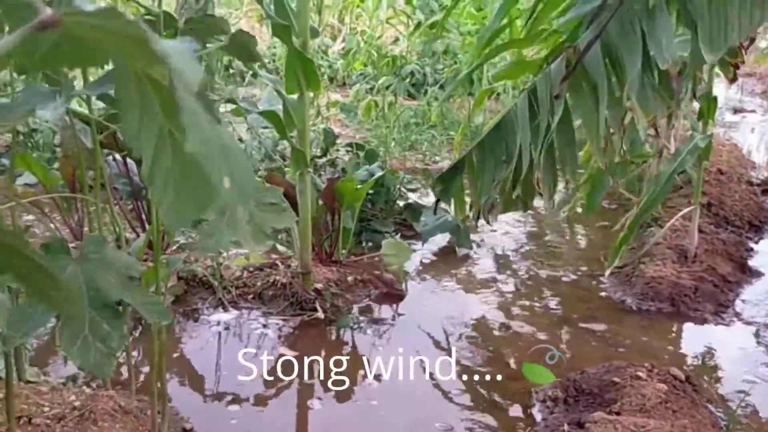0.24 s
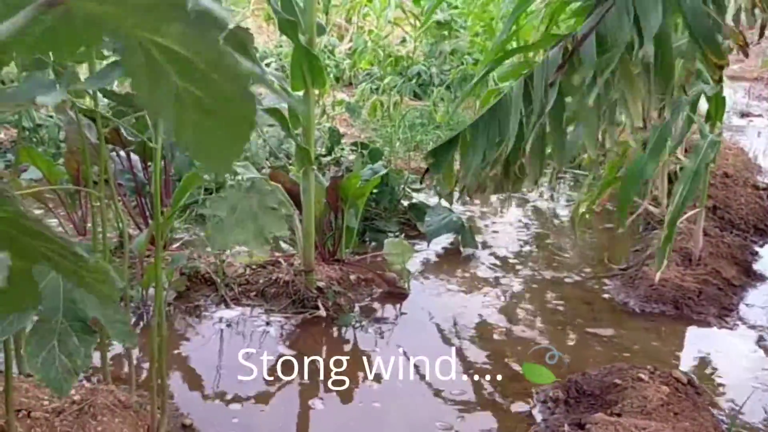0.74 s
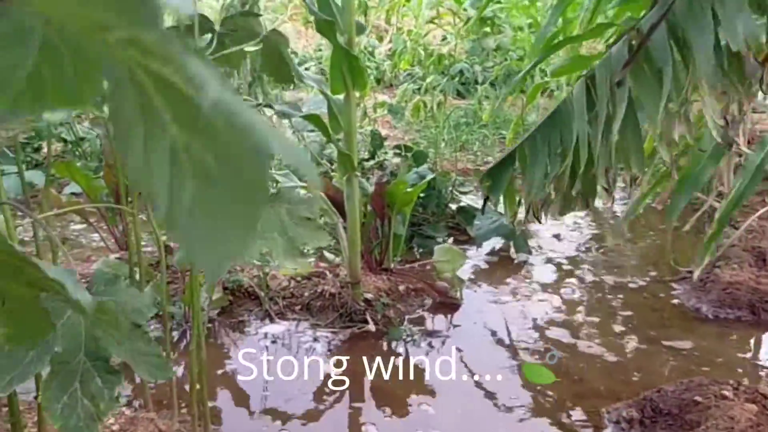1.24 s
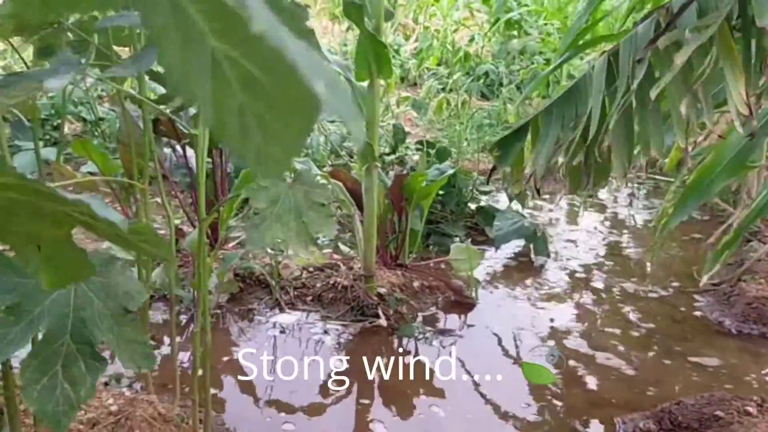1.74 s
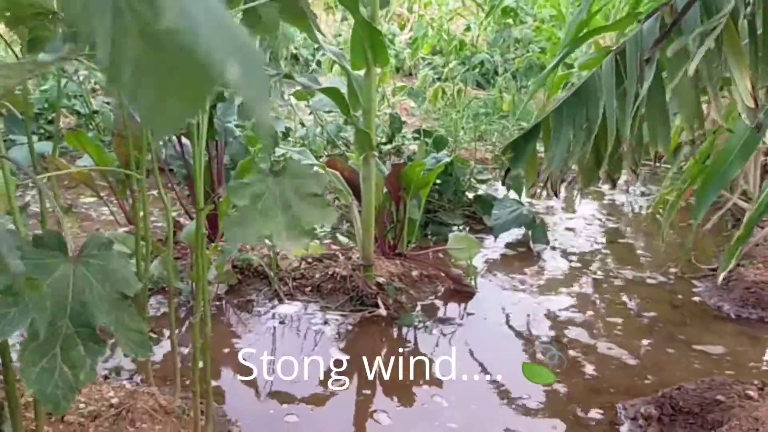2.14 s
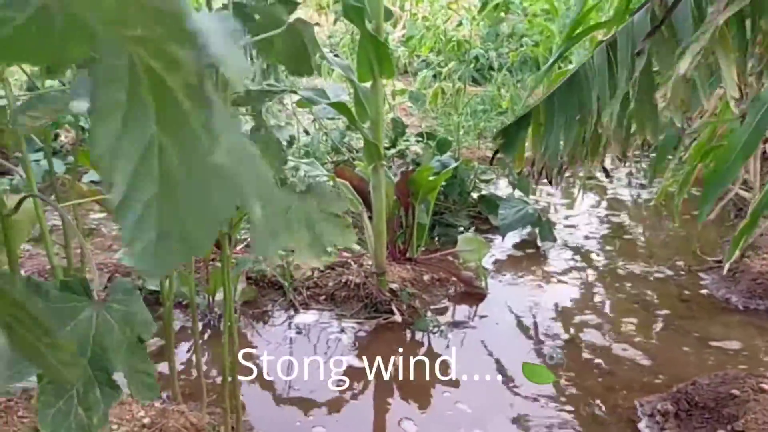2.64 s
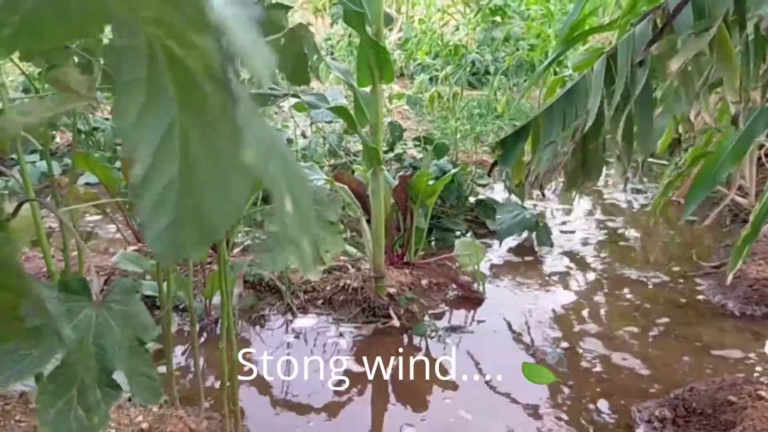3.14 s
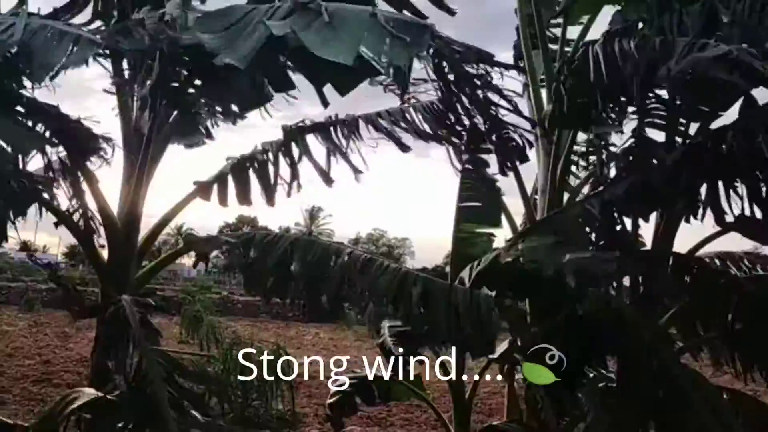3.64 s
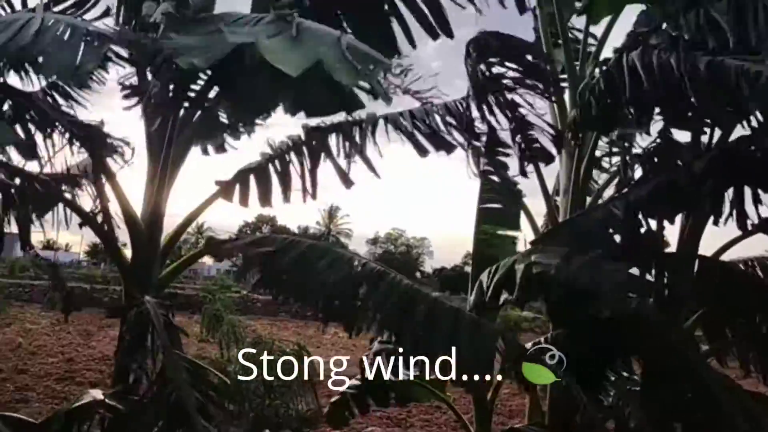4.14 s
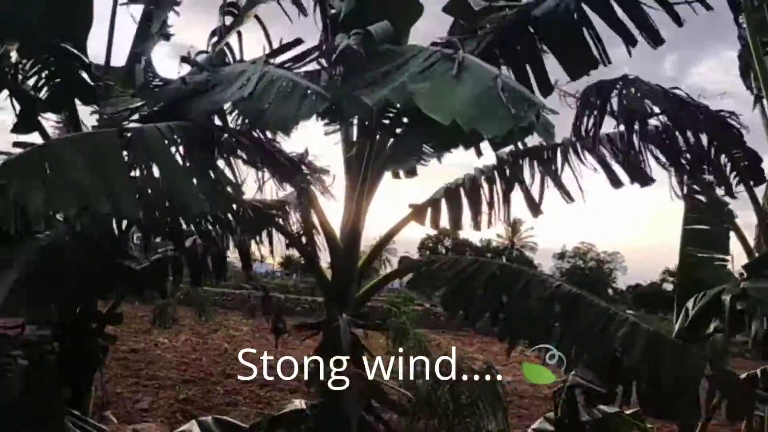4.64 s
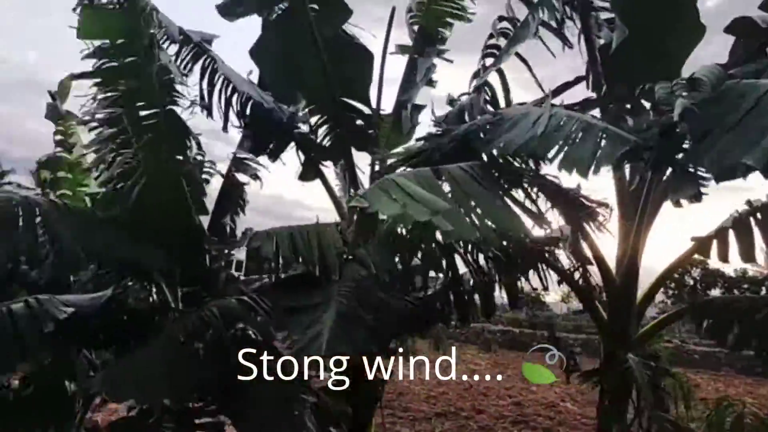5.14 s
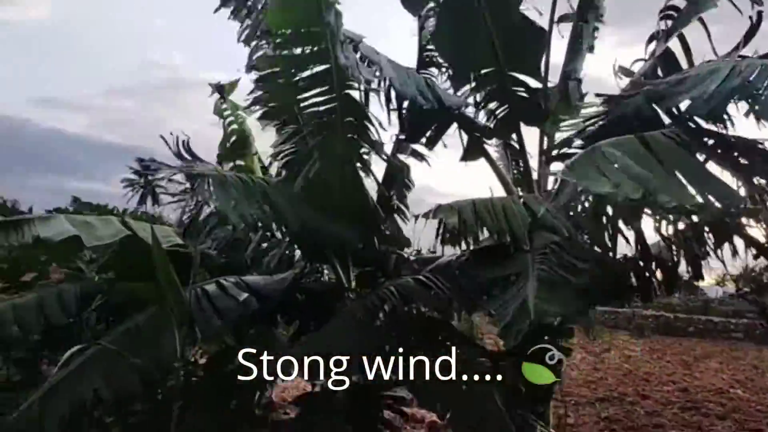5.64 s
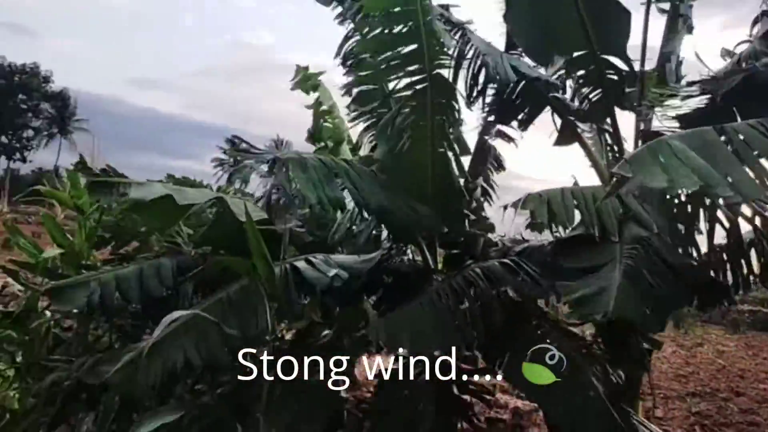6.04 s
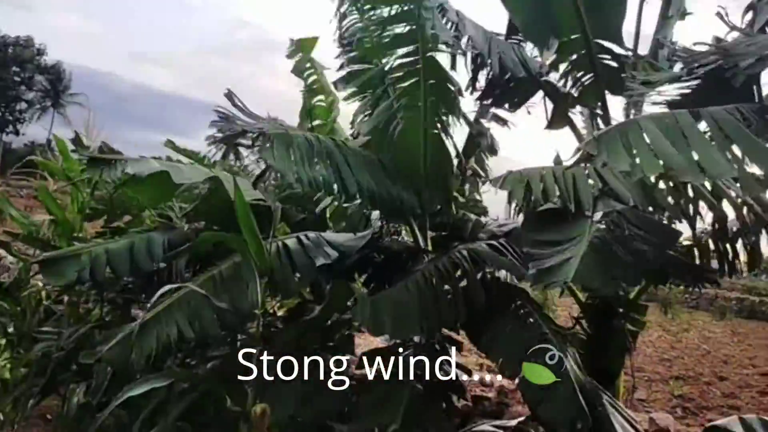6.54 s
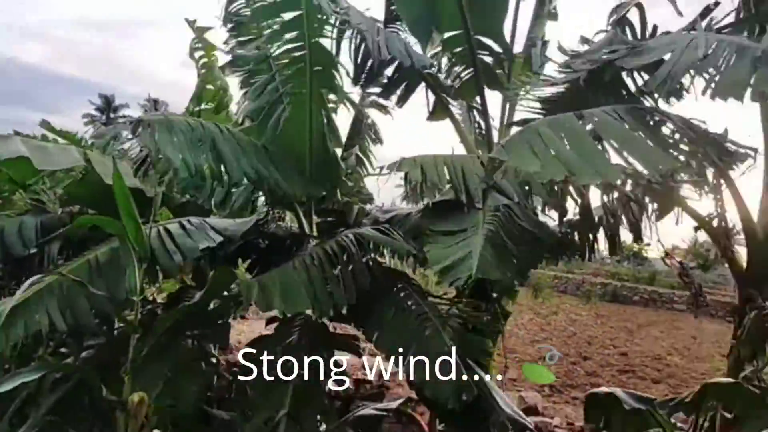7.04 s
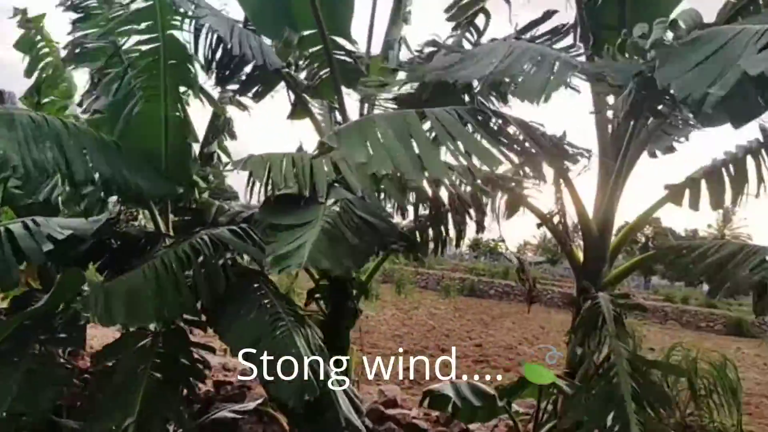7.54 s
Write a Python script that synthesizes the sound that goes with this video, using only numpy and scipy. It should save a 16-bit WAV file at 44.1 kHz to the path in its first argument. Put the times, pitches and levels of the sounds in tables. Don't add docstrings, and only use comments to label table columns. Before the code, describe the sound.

Strong wind in an open garden, caught close on a phone. From 0 to 3.7 s gusts buffet the microphone with low, fluttering thumps, heavy around 0.2 s, 1.7 s and 3.1 s, while small shrub leaves make a continuous dense hiss with papery slaps and touches. A crisp, loud leaf snap cracks at about 1.97 s, a small sharp pop at 2.7 s, and the hardest gust pops loudly at 3.47 s. At 3.7 s the sound cuts abruptly to large torn fronds: quieter rustle, rapid dry high ticks, a bright, ringing fizz and hollow low flaps, with only light wind rumble. A faint, short, hoarse bird note comes around 4.5-4.6 s. From 5.3 s the high fizz softens as the phone turns; slaps at 5.7 s and a swelling leaf press at 6.1 s stand out, then scattered crackling, thicker from 7.1 s, continues to the end at 7.8 s.

```python
import sys
import numpy as np
from scipy import signal
from scipy.fft import rfft, irfft
from scipy.io import wavfile
from scipy.ndimage import uniform_filter1d

SR = 44100
rng = np.random.default_rng(int(sys.argv[2]) if len(sys.argv) > 2 else 0)


def store_pcm(level_fs):
    pcm = np.round(np.clip(level_fs, -1, 1) * 32767).astype(np.int16)
    wavfile.write(sys.argv[1], SR, np.atleast_2d(pcm).T)


def decibels_to_gain(level_db):
    exponent = np.asarray(level_db, float) / 20
    return 10 ** exponent


N = 343539

# (time [s], frequency [Hz], relative level [dB])
CAVITY_RING = [(3.7, 10360, -16), (3.9, 10200, -12), (4.4, 10370, -12), (4.62, 10800, -12),
               (4.85, 10650, -16), (4.95, 10540, -15), (5.06, 10760, -12), (5.22, 10060, -9),
               (5.4, 9340, -13), (5.6, 9350, -16), (5.8, 10240, -21), (7.0, 9650, -23), (7.79, 9600, -20)]


def evened(x):
    return x / np.sqrt(np.mean(x ** 2) + 1e-20)


def read(points, hz):
    f, value = np.transpose(points)
    return np.interp(np.log(hz + 1), np.log(f + 1), value)


def columns(rows):
    s, *values = np.transpose(rows)
    return [np.interp(np.arange(N) / SR, s, v) for v in values]


def causal(points, size=4096):
    level_db = read(points, abs(np.fft.fftfreq(size, 1 / SR)))
    log_gain = np.log(decibels_to_gain(np.maximum(level_db, -100)))
    phase = -signal.hilbert(log_gain).imag
    taps = np.fft.ifft(np.exp(log_gain + 1j * phase)).real[:size // 2]
    return taps / np.linalg.norm(taps)


def drift(per_s):
    hz = np.fft.rfftfreq(N, 1 / SR)
    spectrum = rfft(rng.standard_normal(N)) / (1 + (hz / per_s) ** 2)
    return evened(irfft(spectrum, N))


def resonate(x, hz, width):
    carrier = np.exp(2j * np.pi * np.cumsum(hz) / SR)
    r = np.exp(-np.pi * width / SR)
    return 2 * (carrier * signal.lfilter([1 - r], [1, -r], x / carrier)).real


def gusts():
    # (time [s], level [dB])
    breeze = [(0.0, -50), (1.0, -50.5), (1.55, -46), (2.1, -53.5), (3.3, -41), (3.6, -40.5), (4.25, -53),
              (5.0, -59), (6.2, -54.5), (7.2, -57.5), (7.79, -56)]
    # (centre [s], length [s], strength [dB], hardness [dB])
    shrub_gusts = [(0.06,0.14,-39,-17),(0.198,0.039,-30.5,-16),(0.238,0.035,-28,-15),(0.335,0.12,-34,-4),(0.479,0.18,-37.5,-6),(0.556,0.085,-43,-15),(0.637,0.18,-39,-23),(0.752,0.14,-39.5,-3.5),
                   (1.07,0.13,-40.5,-1),(1.234,0.077,-44,-15),(1.326,0.046,-36.5,-7),(1.44,0.094,-37,-5),(1.605,0.14,-33.5,-9),(1.669,0.044,-26.5,-8),(1.764,0.094,-39.5,-18),
                   (2.04,0.12,-48,-16),(2.14,0.125,-49,-4),(2.39,0.061,-39,-17),(2.489,0.2,-41,-5.5),(2.66,.06,-39,-17),(2.743,0.17,-35.5,-4.5),(2.867,0.07,-43,-6),
                   (2.966,0.091,-38,-12),(3.083,0.067,-28,-10),(3.26,0.057,-33.5,-10),(3.433,0.033,-29.5,-5),(3.464,0.048,-24,12),(3.654,0.042,-32,1)]
    frond_gusts = [(3.791, 0.099, -35.5, -6), (3.931, 0.031, -45, 7), (3.996, 0.064, -54, -16),
                   (4.066, 0.07, -47, -21), (4.35, 0.022, -38, -11), (4.47, 0.061, -47, 0),
                   (4.52, 0.033, -41.5, -5), (4.58, 0.021, -38, -15), (4.684, 0.081, -45, -0.5),
                   (4.784, 0.025, -37.5, -21), (4.899, 0.19, -44, -3), (5.128, 0.18, -44.5, -7),
                   (5.253, 0.11, -46.5, -6), (5.313, 0.055, -62, -2), (5.368, 0.055, -47, -18),
                   (5.453, 0.046, -49, 0), (5.622, 0.26, -47, -3.5), (5.887, 0.068, -56, 13),
                   (5.976, 0.27, -56, 11), (6.455, 0.11, -51, -2), (6.849, 0.1, -44, 0),
                   (6.934, 0.043, -42, 2), (7.029, 0.081, -50, -7), (7.318, 0.066, -51, -1),
                   (7.428, 0.043, -48, -9), (7.787, 0.085, -42, -1)]
    breeze_hard_db = -4.5
    t = np.arange(N) / SR
    soft = decibels_to_gain(2 * columns(breeze)[0])
    hard = soft * decibels_to_gain(2 * breeze_hard_db)
    for s, length, db, hard_db in shrub_gusts + frond_gusts:
        near = slice(max(round((s - .4) * SR), 0), round((s + .4) * SR))
        power = decibels_to_gain(2 * db) * 4. ** -((2 * (t[near] - s) / length) ** 2)
        share = decibels_to_gain(2 * hard_db)
        soft[near] += power / (1 + share)
        hard[near] += power * share / (1 + share)
    return 10 * np.log10(soft), 10 * np.log10(hard / soft)


def eddies(points, span_s):
    x = signal.oaconvolve(rng.standard_normal(N + SR), causal(points, size=16384))[SR:][:N]
    local_power = uniform_filter1d(x ** 2, round(span_s * SR))
    return evened(x / np.sqrt(local_power + 0.27 * np.mean(x ** 2)))


def buffet():
    # (frequency [Hz], density [dB per Hz])
    eddy_spectra = [
        [(6, -39), (12, 12), (30, -2), (56, -3.5), (75, -23), (200, -88)],
        [(30, -47.5), (55, 2.5), (90, 1.5), (130, -8.5), (170, -35), (400, -111)],
        [(90, -38), (130, -1.5), (190, -4.5), (300, -16), (420, -20.5), (700, -63), (1500, -100)],
    ]
    thump_db, edge_db, edge_per_hard, edge_per_strength = -3.5, -9, 1.25, 0.022
    sway_db = 3
    level_db, hard_db = gusts()
    heave, thump, edge = (eddies(p, s) for p, s in zip(eddy_spectra, (.1, .045, .03)))
    edge = evened(edge * decibels_to_gain(2.0 * drift(39.0)))
    thump_level = thump_db + hard_db + sway_db * drift(18.0)
    edge_level = edge_db + edge_per_hard * hard_db + edge_per_strength * (level_db + 38)
    edge_level += sway_db * drift(21.0)
    return decibels_to_gain(level_db - 1.05) * (heave + decibels_to_gain(thump_level) * thump + decibels_to_gain(edge_level) * edge)


def patchy(patch_db, flicker_db):
    frames = N // 64 + 5
    a, b, patches = rng.standard_normal((frames, 129, 3)).T
    patches = evened(uniform_filter1d(uniform_filter1d(patches, 5, 0), 24, 1))
    flicker = evened(uniform_filter1d(rng.standard_normal(frames), 8))
    z = (a + 1j * b) * decibels_to_gain(patch_db * patches + flicker_db * flicker)
    return evened(signal.istft(z, nperseg=256, noverlap=192)[1][:N])


def grains(per_s, spread_db, lo_hz, hi_hz, cycles, clump_db, count=24):
    chance = per_s / SR * decibels_to_gain(clump_db * drift(14.))
    size = decibels_to_gain(spread_db * np.minimum(rng.exponential(1, N), 3.6)) * (rng.random(N) < chance)
    leaf, out = rng.integers(0, count, N), np.zeros(N)
    for k, hz in enumerate(np.geomspace(lo_hz, hi_hz, count)):
        turns = np.arange(768) * hz / SR
        ring = turns * np.exp(-turns / cycles) * np.sin(2 * np.pi * turns)
        ring_scaled = ring * np.sqrt(hz) / np.linalg.norm(ring)
        out += signal.oaconvolve(size * (leaf == k), ring_scaled)[:N]
    return evened(out)


def foliage():
    # (frequency [Hz], density [dB per Hz])
    holds = [
        [(150, -17.5), (250, -9.5), (456, -11.5), (860, -9.5), (1600, -5), (2300, -0.5), (2760, -4.5),
         (3390, -16), (4240, -15.5), (5210, -7), (6740, -7), (8140, -20.5), (9500, -17), (13000, -19.5),
         (15200, -19)],
        [(150, -22.5), (250, -9.5), (490, -9), (865, -3), (1300, -2.5), (1900, 2), (3550, 2), (4200, -9),
         (5050, -12), (6200, -13.5), (7900, -21), (9500, -17.5), (12600, -22.5), (14300, -21), (15200, -17.5)],
        [(150, -27), (250, -14), (1060, -12.5), (1580, -12.5), (2160, -1), (2520, -1.5), (3150, -5.5),
         (3650, -18.5), (4450, -35), (6180, -21), (8000, -31), (9500, -17.5), (12700, -25.5), (14600, -27),
         (15200, -24)],
    ]
    # (time [s], rustle level [dB], dry fizz above the port dip [relative dB])
    rustle = [
        [(0.0, -34.5, -0.5), (1.55, -35.5, -0.5), (1.98, -37, 0.5), (3.53, -36, -0.5), (3.68, -35, -0.5)],
        [(3.71, -39, -1.5), (3.8, -39, 4), (3.9, -42, 4.5), (5.44, -44.5, 2), (6.65, -43, 0.5),
         (6.87, -44.5, 2.5), (7.44, -42.5, 0), (7.79, -44.5, 1)],
    ]
    # (time [s], share of the turn away from the fronds [0-1])
    aim = [(3.7, 0.3), (3.95, 0.2), (5.05, 0.08), (5.3, 0.29), (5.6, 0.38), (5.9, 0.52), (6.4, 0.65),
           (7.79, 0.59)]
    change_s = 3.693
    level_db, fizz_db = columns(rustle[0] + rustle[1])
    fronds = np.clip((np.arange(N) / SR - change_s) / 0.003, 0, 1)
    turn = np.clip(columns(aim)[0], 0, 1)

    shrubs = patchy(1.0, 0.99) + decibels_to_gain(-10.5) * grains(2500, 5.5, 692, 15100, 1.0, 2.2, count=12)
    shrubs = evened(shrubs)
    torn = patchy(1.1, 1.57)
    torn += decibels_to_gain(-5.0 - 4.2 * turn) * grains(1500, 6.1, 4340, 15800, 1.8, 3.3, count=10)
    torn += decibels_to_gain(-12.5) * grains(700, 4.2, 1156, 3560, 2.9, 3.5, count=12)
    torn = evened(torn)

    drives = [(1 - fronds) * shrubs, fronds * (1 - turn) * torn, fronds * turn * torn]
    heard = sum(signal.oaconvolve(d, causal(hold))[:N] for d, hold in zip(drives, holds))
    fizz = signal.oaconvolve(heard, signal.firwin(101, 4200, pass_zero=False, fs=SR), "same")

    ring_hz, ring_db = columns(CAVITY_RING)
    late = evened(np.roll(torn, 600) + decibels_to_gain(-8.5) * grains(900, 4.0, 4200, 13600, 1.5, 2.8, count=6))
    broad = resonate(late, ring_hz + 200, 2600)
    sharp = evened(resonate(broad, ring_hz - 450, 890) - resonate(broad, ring_hz + 650, 1400))
    cavity = (1 - .5 * turn) * sharp + .5 * turn * evened(broad)
    lower_hz = 0.47 * ring_hz
    lower_mode = evened(resonate(resonate(late, lower_hz, 800), lower_hz, 800))
    cavity += decibels_to_gain(2.5) * (1 - turn) ** 4 * lower_mode
    return decibels_to_gain(level_db - 1.0) * (heard + (decibels_to_gain(fizz_db) - 1) * fizz + fronds * decibels_to_gain(ring_db) * cavity)


def knocks(rows, rise_s, spread, echo, crack_db=-15.0, beat=0.64):
    out, t = np.zeros(N + 3000), np.arange(2500) / SR
    for (s, db, hz, t60), noise in zip(rows, rng.standard_normal((len(rows), 2500))):
        beating = 1 + beat * np.cos(2 * np.pi * spread * hz * t + .5 * noise[0])
        ring = np.sin(2 * np.pi * hz * t) * beating
        shape = (1 - np.exp(-t / rise_s)) ** 2 * decibels_to_gain(-60 * t / max(t60, .001))
        scatter = echo * evened(uniform_filter1d(noise, 12)) * np.exp(-t / 0.0065) * (t > rise_s)
        width = max(round(SR / hz / 3), 1)
        rough = np.gradient(uniform_filter1d(uniform_filter1d(noise, width), width))
        crack = decibels_to_gain(crack_db) * evened(rough) * np.minimum(t * hz, 1) * np.exp(-t * hz / 4.4)
        ringing = ring * (shape + scatter * shape.max()) / abs(ring * shape).max()
        out[round(s * SR):][:2500] += decibels_to_gain(db - 0.5) * (ringing + crack)
    return out[:N]


def slaps():
    leaf_slaps = [(1.1494, -37, 2280), (1.383, -25, 2240), (1.6293, -27, 1930), (1.7836, -30, 2270),
                  (1.805, -24.5, 2360), (1.8455, -27, 2470), (1.8653, -27, 2550), (1.968, -20, 2170),
                  (2.1415, -30, 2100), (2.2783, -26, 2460), (2.4085, -25.5, 2200), (2.572, -28, 2620),
                  (2.634, -29, 2590), (2.713, -31.5, 2450), (2.767, -25, 2270), (2.8453, -26.5, 2550),
                  (3.262, -25, 1820), (3.3486, -30, 2470), (3.632, -35, 2160),
                  (3.796, -30, 1800), (4.0635, -32, 3240), (4.3284, -31, 3480), (4.375, -34, 3160),
                   (4.45, -31, 3100), (4.498, -33, 2340), (4.6797, -27.5, 3240), (4.7534, -33, 3270),
                   (4.864, -28, 2230), (5.0994, -31, 2490), (5.4533, -32, 1880), (5.5534, -25.5, 2360),
                   (5.615, -33.5, 2280), (5.675, -22, 2240), (5.8476, -34, 2060), (5.957, -29, 2080),
                   (6.2898, -37, 2020), (6.4616, -28.5, 2050), (6.6504, -32, 2490), (6.7557, -29, 1890),
                   (7.132, -32, 2460), (7.208, -30, 2550), (7.273, -33, 2600), (7.3066, -29, 2190),
                   (7.319, -28, 2400), (7.423, -30, 2540), (7.497, -32, 2430), (7.564, -28, 2570),
                   (7.582, -27, 1770), (7.685, -31, 2400),
                  (5.7573, -34, 1960), (5.8953, -33, 3100), (5.9095, -33.5, 2190), (6.0013, -38, 2540),
               (6.2168, -35, 2090), (6.243, -33, 2340), (6.252, -38, 2280), (6.3729, -38, 2230),
               (6.564, -30, 2440), (6.6079, -37, 2070), (6.6622, -29.5, 2210), (6.783, -31, 1880),
               (6.8962, -42, 2430), (6.9513, -34, 1880), (7.0045, -39, 2870), (7.0515, -35, 2870),
               (7.1716, -37, 2130), (7.3961, -32, 2340), (7.452, -33.5, 2300), (7.538, -37, 2560),
               (7.6395, -30, 2500), (7.66, -33, 2640), (7.7278, -36, 2260), (7.7463, -37, 2400),
               (7.7638, -32.5, 2680),
                  (0.1689, -30, 2200), (0.2904, -37, 2350), (0.5276, -25, 2530), (0.7998, -39, 2290),
               (0.98, -33, 2150), (1.1247, -38, 2370), (1.6979, -32, 2530), (2.1155, -29, 2240),
               (2.4851, -32, 2400), (2.6652, -30, 2490), (4.4044, -39, 3210), (4.5644, -35, 3470),
               (4.5965, -35, 3100), (7.1524, -36, 2110), (7.191, -38, 2430), (7.2244, -37, 2500),
               (7.25, -36, 2530), (7.29, -34, 2210), (7.5444, -32, 2630), (7.6054, -36, 2380),
               (7.7844, -35, 2430)]
    t60_s = 0.009
    rows = [(*row, t60_s) for row in leaf_slaps]
    return knocks(rows, 0.00063, 0.13, 0.088, crack_db=-20.0, beat=0.6)


def flutters():
    # (centre [s], peak [dB], frequency [Hz])
    vortices = [(0.245, -32, 88), (0.32, -31, 81), (0.774, -37, 118), (1.626, -33.5, 89.5), (1.68, -36, 75),
                (1.684, -36, 144), (2.664, -42, 55.3), (2.74, -40, 80), (3.441, -27.5, 185),
                (3.091, -34, 96), (3.4775, -25, 95), (3.502, -26.5, 69.6), (3.432, -36, 40),
                (3.458, -30.5, 152), (3.645, -31.5, 59.6), (3.683, -35, 34.8), (4.6, -46, 98),
                (4.679, -43, 99)]
    cycles = 1.0
    out, t = np.zeros(N), np.arange(N) / SR
    for s, db, hz in vortices:
        near = slice(round((s - .1) * SR), round((s + .1) * SR))
        turns = hz * (t[near] - s)
        out[near] += decibels_to_gain(db) * np.exp(-(turns / cycles) ** 2) * np.cos(2 * np.pi * turns)
    return out


def ticks():
    # (time [s], peak [dB], ring [Hz])
    shrub_ticks = [
        (1.051, -38, 9940),
        (1.6257, -39, 10600),
        (1.786, -37, 10500),
        (1.8255, -28, 10300),
        (1.9465, -32, 9400),
    ]
    # (time [s], peak [dB], ring [Hz])
    thin_ticks = [(3.7971, -43, 12700), (3.9213, -43, 12600), (4.0396, -44, 13600), (4.1753, -43, 14800),
                  (4.2501, -49, 12800), (4.2955, -45, 15000), (4.3738, -42, 12700), (4.494, -48, 14600),
                  (4.5773, -46, 14700), (4.6507, -50, 14300), (4.8048, -43, 14800), (5.0498, -40, 14900),
                  (5.2553, -50, 12700), (5.5791, -49, 13400)]
    # (time [s], peak [dB])
    frond_ticks = [(3.6983, -49), (3.7296, -33), (3.7627, -40), (3.7812, -36), (3.8365, -35), (3.8535, -41),
                   (3.868, -34), (3.9213, -38), (3.9832, -39), (4.0396, -41), (4.052, -35), (4.075, -44),
                   (4.0989, -45), (4.1199, -43), (4.1383, -30.5), (4.1628, -39), (4.1753, -33),
                   (4.2365, -31), (4.2955, -37), (4.3284, -38), (4.3608, -36), (4.3738, -35), (4.3968, -41),
                   (4.4731, -33), (4.494, -43), (4.5265, -41), (4.5479, -44), (4.5798, -43), (4.6138, -33),
                   (4.6512, -40),
                   (4.6518, -43), (4.6618, -41), (4.6803, -41), (4.7042, -37), (4.7207, -38), (4.7431, -39),
                   (4.789, -42), (4.813, -37), (4.8379, -40), (4.8723, -38), (4.8968, -38), (4.9282, -40),
                   (4.9397, -35), (4.9995, -44), (5.0335, -43), (5.0683, -30), (5.0998, -33), (5.1193, -45),
                   (5.1761, -46), (5.1941, -37), (5.218, -37), (5.243, -40), (5.2555, -42), (5.2789, -35),
                   (5.3288, -38), (5.3782, -40), (5.416, -36), (5.465, -44), (5.4954, -47), (5.5523, -43),
                   (5.5792, -39), (5.6176, -42), (5.6326, -40), (5.6735, -49), (5.7179, -38), (5.7733, -42),
                   (5.7875, -32), (5.8381, -45), (5.956, -36), (6.1534, -44), (6.2502, -43), (6.3111, -40),
                   (6.4807, -42), (6.5041, -37), (6.5924, -43), (6.6533, -47), (6.7241, -48), (6.8114, -44),
                   (6.8917, -42), (6.9296, -45), (7.1606, -49), (7.172, -42), (7.3178, -37), (7.445, -46),
                   (7.4669, -44), (7.4794, -41), (7.5622, -48), (7.5747, -40), (7.6036, -44), (7.76, -44)]
    t60_s, over_ring = 0.0065, 1.02
    ring_s, ring_hz, _ = np.transpose(CAVITY_RING)
    rows = shrub_ticks + thin_ticks
    rows = rows + [(s, db, over_ring * np.interp(s, ring_s, ring_hz)) for s, db in frond_ticks]
    return knocks([(*row, t60_s) for row in rows], 0.0005, 0.08, 0.25, crack_db=-10.0, beat=0.75)


def snaps():
    # (time [s], peak [dB], ring [Hz], t60 [s])
    snap_modes = [(1.8046, -26, 13600, .002), (1.8046, -18, 10300, .002), (1.9588, -27, 9800, .003),
                  (1.9666, -19, 13800, .003), (1.9666, -12, 10900, 0.0025), (1.9666, -15, 9500, 0.0025),
                  (1.9666, -24, 5300, 0.0033), (1.982, -30, 10700, .003), (5.1, -32.5, 3500, .008),
                  (4.9395, -36, 8800, .004), (4.4731, -38, 8300, .003), (7.5627, -38, 3900, .005),
                  (3.52, -33, 9800, .003), (3.556, -35, 12500, .003)]
    return knocks(snap_modes, 0.00019, 0.098, 0.083, beat=0.19)


def pops():
    # (time [s], peak [dB], rise [s], fall [s])
    steps = [
        (2.7001, -20, .0001, .002),
        (2.7295, -27, .001, .006),
        (3.4735, 2, .004, .002),
    ]
    out, t = np.zeros(N), np.arange(N) / SR
    for s, db, rise_s, fall_s in steps:
        since = np.maximum(t - s, 0)
        out += decibels_to_gain(db) * (1 - np.exp(-since / rise_s)) ** 2 * np.exp(-since / fall_s)
    return out


def flaps():
    # (time [s], peak [dB], ring [Hz])
    frond_flaps = [(3.134, -36, 1140), (3.174, -38, 1440), (3.261, -31, 1130), (3.417, -48, 1310),
                   (3.796, -35, 1580), (4.476, -38, 1460), (4.627, -35, 1380), (4.794, -39, 1430),
                   (4.895, -36, 1290), (5.098, -37.5, 1340), (5.126, -41, 830), (5.253, -36, 1310),
                   (5.255, -44, 770), (5.281, -41, 1350), (5.446, -37, 1290), (5.534, -34, 1520),
                   (5.675, -34.5, 1340), (6.243, -38.5, 1260), (6.385, -40.5, 810), (7.508, -36, 1460)]
    t60_s = 0.019
    return knocks([(*row, t60_s) for row in frond_flaps], 0.00057, 0.306, 0.07)


def low_ticks():
    # (time [s], peak [dB])
    mode_ticks = [(4.0521, -40), (4.0661, -35), (4.12, -33), (4.1379, -37), (4.1634, -38), (4.333, -38),
                  (4.4692, -40), (4.547, -38), (4.599, -36), (4.6802, -36), (4.7545, -54), (4.8688, -38)]
    mode_hz, t60_s = 4900, 0.013
    return knocks([(*row, mode_hz, t60_s) for row in mode_ticks], 0.0003, 0.058, 0.1)


def bird():
    # (time [s], pitch [Hz], level [dB])
    call = [(4.47, 1520, -70), (4.485, 1470, -54), (4.515, 1450, -55), (4.53, 1200, -52),
            (4.552, 1290, -48), (4.57, 1370, -46), (4.59, 1240, -47), (4.61, 1150, -48), (4.628, 1300, -50),
            (4.645, 1550, -72)]
    hz, level_db = columns(call)
    phase = 2 * np.pi * np.cumsum(hz * (1 + 0.005 * drift(123.0))) / SR
    return decibels_to_gain(level_db - 4.0 + 1.7 * drift(40.)) * (np.sin(phase) + .3 * np.sin(2 * phase))


def presses():
    # (time [s], peak [dB], ring [Hz])
    leaf_presses = [(4.731, -33, 2150), (5.164, -34, 2280), (5.172, -33, 2000), (5.18, -29, 2280),
                    (5.693, -26.5, 2140), (6.0839, -22.5, 2105), (6.697, -24, 2210), (7.02, -32, 2800),
                    (7.343, -32, 1850), (7.515, -31.5, 2390), (6.18, -36, 2270), (7.6128, -30.5, 2320)]
    t60_s = 0.014
    return knocks([(*row, t60_s) for row in leaf_presses], 0.001, 0.099, 0.079)


def scene():
    wind = buffet() + flutters() + pops()
    contacts = slaps() + ticks() + snaps() + flaps() + low_ticks() + presses()
    return (wind + foliage() + contacts + bird())[None]


def top_cut(x):
    return signal.sosfilt(signal.butter(12, 16380, fs=SR, output="sos"), x)


def record(dry):
    edge_hz = 15075
    low_pass = signal.firwin(1601, edge_hz, window=("kaiser", 6), fs=SR)
    limited = signal.oaconvolve(dry, low_pass[None], "same")
    return top_cut(limited)


dry = scene()
out = record(dry)
store_pcm(out)
```